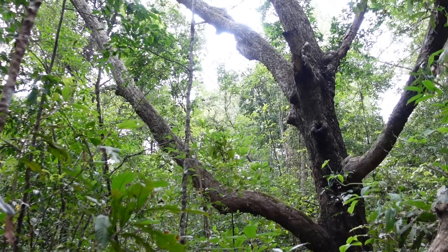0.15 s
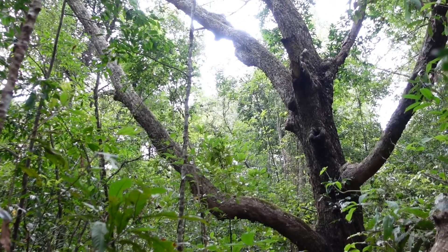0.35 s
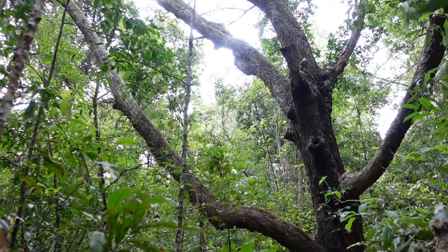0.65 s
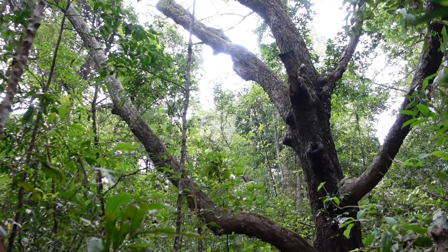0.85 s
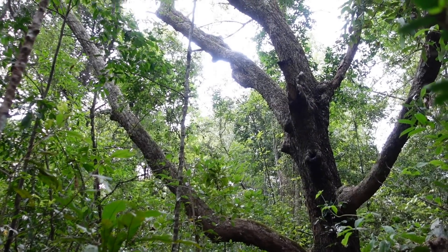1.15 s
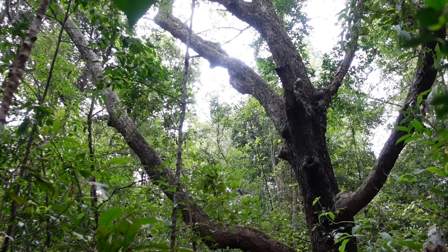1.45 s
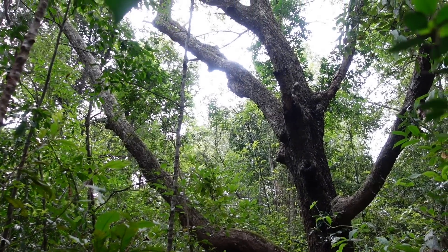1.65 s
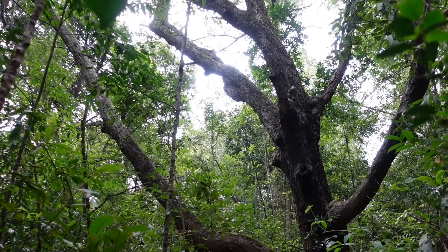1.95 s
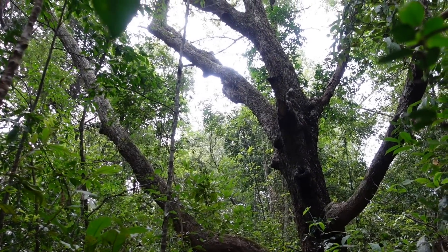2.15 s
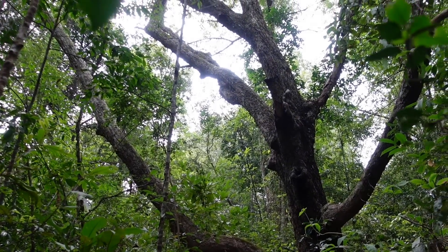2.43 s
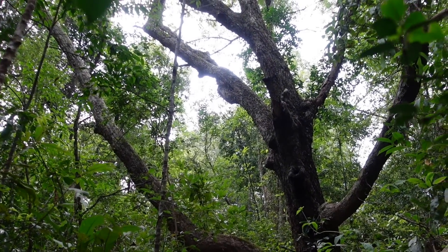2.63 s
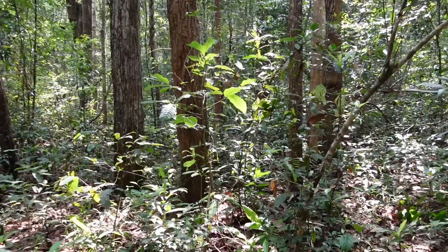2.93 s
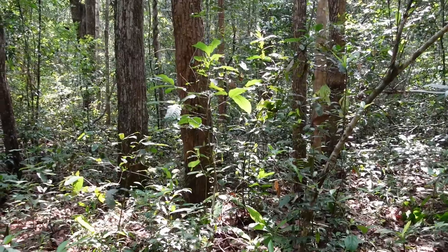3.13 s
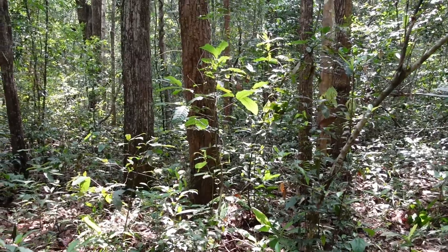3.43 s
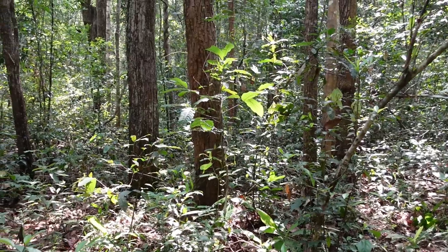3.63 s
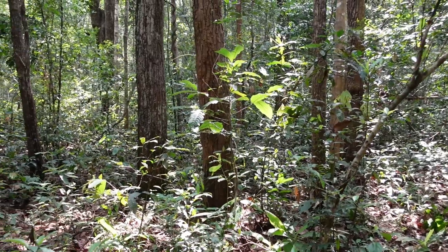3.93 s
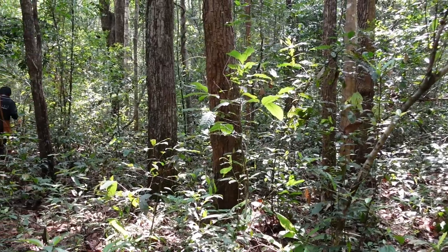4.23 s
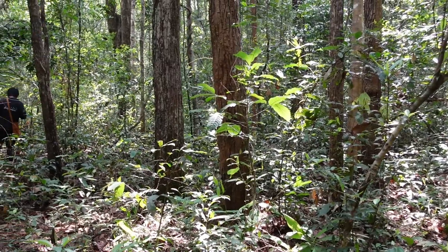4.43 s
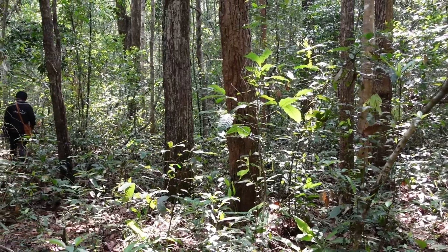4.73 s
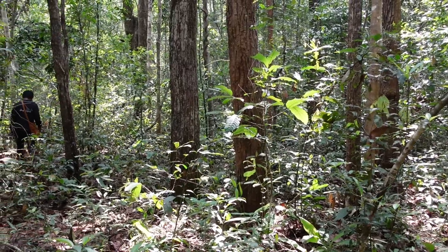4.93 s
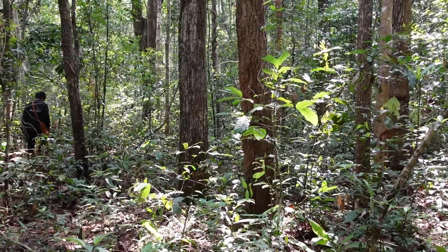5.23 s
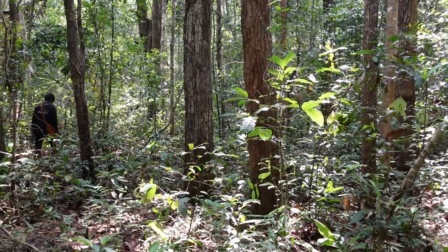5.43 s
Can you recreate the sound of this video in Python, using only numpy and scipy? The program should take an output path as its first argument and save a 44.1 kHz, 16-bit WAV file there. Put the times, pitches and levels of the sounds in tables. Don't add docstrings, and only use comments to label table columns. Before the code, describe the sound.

In a daytime tropical forest, cicadas buzz in a high, throbbing drone over hissing insects. A bird chirps quickly at the very start and faintly again around two seconds, while a bush cricket whistles very high notes. At three seconds the place changes abruptly: other cicadas take over, and slow steps rustle dry leaves and snap twigs. Wide stereo outdoor pickup, with soft forest echoes and little low end.

```python
import sys
import numpy as np
from scipy import signal
from scipy.fft import rfft, irfft, next_fast_len
from scipy.io import wavfile
from scipy.ndimage import uniform_filter1d, map_coordinates

SR = 44100
rng = np.random.default_rng(int(sys.argv[2]) if len(sys.argv) > 2 else 0)


def how_loud(loudness_db):
    steps = np.asarray(loudness_db, float) / 20
    return 10 ** steps


def wrap_up_sound(samples):
    columns = np.atleast_2d(samples).T
    tamed = np.clip(columns, -1, 1)
    steps = np.round(tamed * 32767).astype(np.int16)
    wavfile.write(sys.argv[1], SR, steps)


N = 246342


def unit(x):
    return x / np.sqrt(np.mean(x ** 2) + 1e-20)


def along(points, hz):
    f, v = np.transpose(points)
    return np.interp(np.log(hz + 1), np.log(f + 1), v)


def wobble(rate):
    knots = rng.standard_normal(int(N * rate / SR) + 4)
    return map_coordinates(knots, [np.arange(N) * rate / SR], order=1, prefilter=False)


def filtered(x, response):
    m = next_fast_len(N + 8192)
    return irfft(rfft(x, m) * response(np.fft.rfftfreq(m, 1 / SR)), m)[..., :N]


def swells(rows, rise_s, fall_s):
    t = np.arange(N) / SR
    total = 0
    for start, hold, db in rows:
        rise = np.clip((t - start) / rise_s, 0, 1)
        fall = np.exp(-np.clip(t - start - hold, 0, None) / fall_s)
        total = total + how_loud(db) * rise * fall
    return total


def spots():
    move_s, arrive_s, leave_s = 2.96, 0.13, 0.17
    t = np.arange(N) / SR - move_s
    first = np.clip(1 - (t - arrive_s) / leave_s, 0, 1) ** 2
    second = np.clip(t / arrive_s, 0, 1)
    return first, second


# f/Hz, left-right likeness/1
LIKENESS = [(60, 0.9), (300, 0.46), (700, 0.71), (1500, 0.73), (3000, 0.8), (5000, 0.77), (9000, 0.6),
            (13500, 0.76)]


def rush(spectrum, patchy_db, source=None):
    if source is None:
        source = rng.standard_normal((2, N))
    z = signal.stft(source, nperseg=512)[2]
    field = uniform_filter1d(rng.standard_normal(z.shape[1:]), 5, 0)
    field = uniform_filter1d(field, 14, 1)
    pair = signal.istft(z * how_loud(patchy_db * unit(field)), nperseg=512)[1][:, :N]

    def mid_side(hz):
        turn = np.arccos(np.clip(along(LIKENESS, hz), -1, 1)) / 2
        return how_loud(along(spectrum, hz)) * [np.cos(turn), np.sin(turn)]

    mid, side = filtered(pair, mid_side)
    return unit(np.array([mid + side, mid - side]))


def trees(x, t60, alike):
    t = np.arange(SR * 3 // 4) / SR
    build_up = 1 - np.exp(-t / 0.0062)
    a, b = rng.standard_normal((2, len(t))) * how_loud(-60 * t / t60) * build_up
    apart = np.sqrt(1 - np.clip(alike, 0, 1) ** 2)
    tail = np.array([a, alike * a + apart * b]) / np.linalg.norm(a)
    return signal.fftconvolve(np.atleast_2d(x), tail, axes=1)[:, :N]


# clicks under the main partial/1, first heard t/s, main partial f/Hz, drift/(Hz/s)
SINGERS = [(9, 0, 5932, 24), (9, 0, 6126, -10.5), (9, 0, 5788, 2), (9.43, 1.3, 6360, -8.5),
           (9, 2.96, 5882, 11), (9, 2.96, 6044, 17), (9, 2.96, 6177, -4.5), (9, 4.6, 6166, -20),
           (9.43, 2.96, 6313, -10), (9.46, 4.6, 6452, -4), (9, 3.8, 5975, 20.5)]
# throb depth/1, left over right level/dB, lower partials level/dB
VOICES = [(1.18, -4, -0.5), (1.73, -13.5, -0.5), (0.34, -11, -4), (.4, 3, 0), (1.47, -7, 5), (0.53, -4, -8),
          (0.91, 9, 5), (0.71, 4, -6), (1.6, 9, -1), (.27, -3, 0), (0.97, -16, -6)]
# start t/s, hold t/s, level/dB, upper partials level/dB
PHRASES = [
    [(-2, 5, -33, 1), (-1.3, 0.73, -33, 0), (0.46, 0.84, -37, 7), (2, .7, -44, 3)],
    [(-1, 5, -41.5, -10), (1.9, 0.51, -44.5, 5)],
    [(.4, 0.65, -41.5, -11), (2.3, 0.58, -41.5, -11)],
    [(1.456, 1.13, -38, -8)],
    [(2, 4, -37.5, -6), (2.7, 0.56, -36, 2), (3.75, 0.49, -40.5, 3), (4.6, 0.58, -33, -5)],
    [(2, 4, -44, -8), (4.3, 1.08, -35, -3)],
    [(1.8, 2.07, -38, -4)],
    [(4.788, 0.34, -34.5, 0)],
    [(3.1, 1.25, -41, -2)],
    [(4.65, .7, -52, -1)],
    [(3.8, 0.52, -54, 3), (4.95, .7, -38.5, -5)],
]
# f/Hz, level/dB
TYMBAL = [(4500, -28), (5280, -16.5), (5430, -10.5), (5680, -5), (5950, 3), (6300, -1), (6650, -8.5),
          (7250, -18), (8000, -28), (9500, -38)]


def cicadas():
    clicks_per_stroke, rise_s, fall_s = 30, 0.31, 0.3
    out, t = np.zeros((2, N)), np.arange(N) / SR
    for singer, voice, phrases in zip(SINGERS, VOICES, PHRASES):
        clicks, first_s, first_hz, drift = singer
        depth, pan_db, lower_db = voice
        heard = spots()[int(first_s > 2.9)]
        on = heard > 0
        hz = (first_hz + drift * (t - first_s))[on]
        lower_rows = [p[:3] for p in phrases]
        upper_rows = [(s, hold, db + up_db) for s, hold, db, up_db in phrases]
        level = swells(lower_rows, rise_s, fall_s)[on]
        upper = swells(upper_rows, rise_s, fall_s)[on]
        turns = 2 * np.pi * np.cumsum(hz + 0.7 * wobble(8)[on]) / SR
        stroke = turns / clicks / clicks_per_stroke + rng.uniform(0, 2 * np.pi)
        throb = unit(np.exp(0.22 * depth * np.cos(stroke)))
        bend = depth * np.sin(stroke + 1.1)
        steps = np.arange(-3, 6) / 2
        gain_db = along(TYMBAL, hz.mean() * (1 + steps / clicks))
        gains = how_loud(gain_db - 13.3 * (steps % 1 > 0) + lower_db * (steps < 0))
        partials = [g * np.sin(turns * (1 + k / clicks) + bend + k * k) for k, g in zip(steps, gains)]
        song = (level * sum(partials[:5]) + upper * sum(partials[5:])) / np.std(sum(partials))
        pan = how_loud([[pan_db / 2], [-pan_db / 2]])
        out[:, on] += song * throb * heard[on] * how_loud(2.45 * wobble(7.6)[on]) * pan
    return 0.61 * out + 0.84 * trees(out, t60=0.84, alike=0.75)


def tone(hz, level, flutter_db, rate):
    flutter = how_loud(flutter_db * wobble(rate))
    return np.sqrt(2) * level * flutter * np.sin(2 * np.pi * np.cumsum(hz) / SR)


# start t/s, hold t/s, level/dB
SHRILL = [(.02, 0.41, -45.5), (.46, 0.13, -43.5), (.68, .13, -38), (.91, 0.044, -38), (1.16, 0.26, -49),
          (1.45, .2, -46), (1.68, 0.12, -50), (1.94, 0.2, -51), (2.28, .16, -51), (2.48, .18, -44.5),
          (2.75, 0.12, -45), (2.94, 0.04, -49), (3.03, 0.05, -50)]
# start t/s, hold t/s, level/dB
WHISTLE = [(.24, .35, -59), (.64, 0.27, -52), (1, 0.16, -60.5), (1.2, .33, -61.5), (1.57, 0.19, -56),
           (1.8, 0.21, -51.5), (2.02, 0.11, -59), (2.25, .37, -59.5), (2.72, 0.084, -53),
           (2.91, 0.13, -54.5)]


def cricket():
    note_every_s, top_hz, sag_hz_per_s = 1.13, 10894, 84
    hz = top_hz - sag_hz_per_s * (np.arange(N) / SR % note_every_s)
    first = spots()[0]
    shrill = swells(SHRILL, rise_s=0.047, fall_s=0.033) * 0.83 + how_loud(-59.5) * first
    low = swells(WHISTLE, rise_s=0.04, fall_s=0.02) * 0.8 + how_loud(-66.5) * first ** 3
    notes = tone(hz, shrill, flutter_db=2.8, rate=45)
    side = tone(hz - 270, np.sqrt(shrill) * how_loud(-37), flutter_db=7.0, rate=8.94)
    whistle = tone(hz / 4, low, flutter_db=1.6, rate=45)
    return (notes + side) * how_loud([[-0.5], [0.5]]) + how_loud([[1.5], [-2.5]]) * whistle


# start t/s, hold t/s, level/dB
STEPS = [(3.02, 0.14, -49), (3.18, 0.13, -51.5), (3.4, 0.29, -57.5), (3.85, 0.09, -50), (3.95, 0.11, -48.5),
         (4.08, 0.12, -54.5), (4.185, 0.026, -46.5), (4.28, .28, -54), (4.61, 0.013, -48.5),
         (4.66, .2, -52), (4.905, 0.017, -49.5), (4.97, 0.17, -58)]
# f/Hz, level/dB
LEAVES = [(120, -25), (300, -10.5), (900, -12.5), (1600, -4), (2500, -3), (4000, -1), (6000, -8),
          (12000, -9)]
# t/s, peak level/dB, f/Hz
SNAPS = [(3.835, -37, 3190), (3.869, -40, 2090), (3.892, -25.5, 3900), (3.9337, -31, 3000),
         (3.9956, -25, 3780), (4.092, -37, 3370), (4.1955, -23, 2860), (4.308, -37, 2160),
         (4.6184, -35, 2730), (4.6733, -33, 2930), (4.8092, -34, 2650), (4.912, -35, 1850)]
# t/s, peak level/dB, f/Hz
KNOCKS = [
    (3.213, -36, 1220),
    (3.995, -36, 1170),
    (4.094, -40.5, 1190),
    (4.685, -45, 1190),
]
# start t/s, hold t/s, level/dB
TREAD = [
    (3.1, 0.039, -69),
    (3.7, 0.24, -64),
    (5.3, 0.17, -69),
]
# f/Hz, level/dB
SOIL = [(80, -30), (140, -1), (220, 4), (330, -7), (600, -30)]


def leaves():
    level = swells(STEPS, rise_s=0.016, fall_s=0.05)
    sizes = np.repeat(how_loud(1.16 * rng.exponential(size=N // 60 + 1)), 60)[:N]
    grains = sizes * rng.standard_normal((2, N))
    crush = level * how_loud(2.0) * rush(LEAVES, patchy_db=1.0, source=grains)
    twigs, t = np.zeros(N + SR), np.arange(900) / SR
    for rows, width_hz in [(SNAPS, 1370), (KNOCKS, 400)]:
        for s, db, hz in rows:
            burst = rng.standard_normal(len(t)) * how_loud(-60 * t / 0.02)
            ring = t * np.exp(-np.pi * width_hz * t) * np.cos(2 * np.pi * hz * t + 0.24)
            snap = np.convolve(burst, ring)[:len(t)]
            twigs[round(s * SR):][:len(t)] += how_loud(db - 5.5) * snap / abs(snap).max()
    twigs = twigs[:N]
    tread = swells(TREAD, rise_s=0.066, fall_s=0.05) * rush(SOIL, patchy_db=7.0)
    echoes = 0.13 * trees(twigs, t60=0.9, alike=1.0)
    return crush + tread + twigs * how_loud([[-1.5], [1.5]]) + echoes


# t/s, length t/s, from f/Hz, to f/Hz, level/dB
CHIRPS = [(0, .03, 2500, 3000, -53), (.012, .03, 2900, 3900, -55), (.04, .06, 3200, 4000, -58),
          (.124, .025, 2400, 2600, -49), (.135, .04, 1900, 2500, -51), (.152, .03, 2400, 3150, -44),
          (.18, .04, 1900, 2250, -50), (.182, .04, 2500, 3200, -48), (.21, .03, 2200, 2800, -52),
          (2.17, .14, 1400, 1480, -65), (2.23, .12, 2200, 2700, -61), (2.3, .24, 2020, 2150, -62),
          (2.33, .12, 2800, 3200, -59), (2.43, .12, 2100, 2500, -62), (2.43, .12, 2700, 3200, -60)]


def bird():
    x = np.zeros(N)
    for s, length, from_hz, to_hz, db in CHIRPS:
        u = np.linspace(0, 1, int(length * SR))
        cycles = length * (from_hz * u + (to_hz - from_hz) * u * u / 2)
        x[int(s * SR):][:len(u)] += how_loud(db) * np.sin(np.pi * u) * np.sin(2 * np.pi * cycles)
    x *= 1 + 1.2 * wobble(600)
    near_trees = 0.6 * trees(x, t60=0.2, alike=0.7)
    deep_forest = trees(x, t60=1.2, alike=0.7)
    return how_loud(3.0) * (0.95 * x + near_trees + deep_forest)


# far chorus level/dB, sizzle level/dB, hiss level/dB, air level/dB, far croak level/dB
SPOTS = [
    (-41.5, -45.5, -44.5, -64.5, -65.5),
    (-41, -44.5, -48.5, -63.5, -65),
]
# f/Hz, level/dB
FAR = [(3000, -43.5), (4200, -24), (5000, -14.5), (5250, -10), (5600, -7.5), (6000, 5.5), (6400, -11),
       (6700, -0.5), (6950, -15.5), (7300, -7), (8000, -21), (9500, -31)]
# f/Hz, level/dB
SIZZLE = [(6000, -24), (7800, 2), (9000, 0), (10500, -0.5), (12500, -15)]
# f/Hz, level/dB
HISS = [(9000, -23.5), (11000, 0), (12000, 0), (13000, -3.5), (14500, -1), (16000, -3)]
# start t/s, hold t/s, level/dB
HISS_SWELLS = [
    (1.8, 1.34, -53.5),
    (4.7, 1, -57),
]
# f/Hz, level/dB
CROAK = [(900, -70), (1300, -2), (1500, 8), (1750, -1), (2300, -16.5)]
# start t/s, hold t/s, level/dB
CROAK_SWELLS = [
    (1.3, 1.8, -69.5),
    (2.15, .9, -65),
    (4.7, 0.34, -72),
]
# f/Hz, level/dB
AIR = [(25, -28), (55, -34), (100, -6), (170, 0.5), (450, -0.5), (900, -7.5), (2000, -10), (2500, -2),
       (3200, -4.5), (4500, 2), (8000, -19)]


def forest():
    first, second = spots()
    levels = np.sqrt(how_loud(SPOTS).T ** 2 @ [first ** 2, second ** 2])
    far, sizzling, hissing, still, croaking = levels
    fade = np.where(first > 0, first, 1)
    hissing = hissing + swells(HISS_SWELLS, rise_s=0.15, fall_s=0.14) * fade
    croaking = croaking + swells(CROAK_SWELLS, rise_s=0.15, fall_s=0.14) * fade
    chorus = far * how_loud(8 + 0.63 * wobble(8.2)) * rush(FAR, patchy_db=1.0) * how_loud([[-1.5], [1.5]])
    sizzle = sizzling * how_loud(3.0) * rush(SIZZLE, patchy_db=0.2) * how_loud([[-0.6], [0.6]])
    hiss = hissing * how_loud(3.5) * rush(HISS, patchy_db=-0.6)
    croak = croaking * how_loud(-4.0) * rush(CROAK, patchy_db=1.0)
    air = still * how_loud(7.5) * rush(AIR, patchy_db=-0.15)
    return chorus + sizzle + hiss + croak + air


def scene():
    return cicadas() + cricket() + leaves() + bird() + forest()


def band_limit(x):
    return signal.sosfilt(signal.butter(12, 16690, fs=SR, output="sos"), x)


def record(dry):
    limited = filtered(dry, lambda hz: (hz < 15480) / (1 + (90 / (hz + 1)) ** 2))
    return band_limit(limited)


dry = scene()
out = record(dry)
wrap_up_sound(out)
```